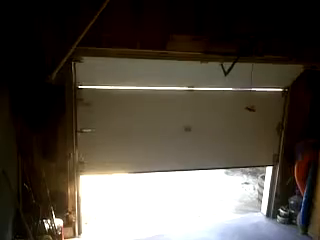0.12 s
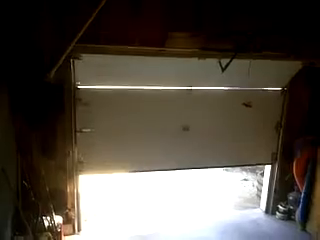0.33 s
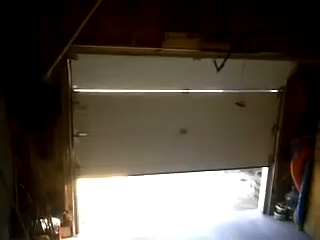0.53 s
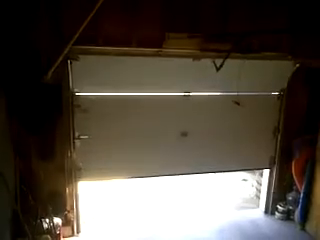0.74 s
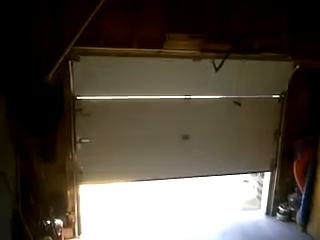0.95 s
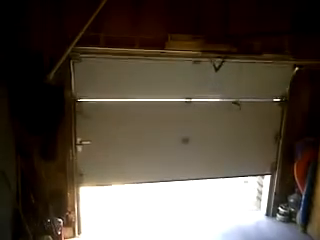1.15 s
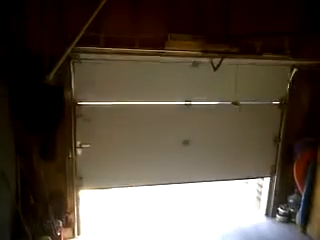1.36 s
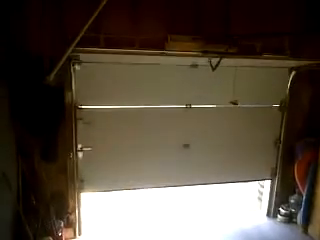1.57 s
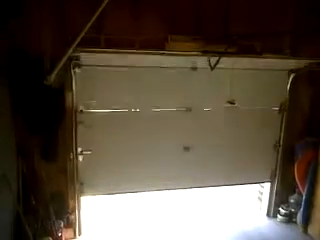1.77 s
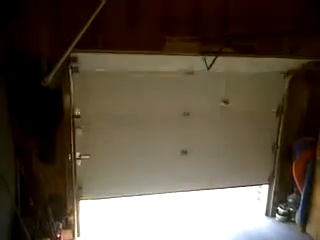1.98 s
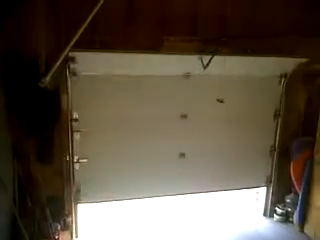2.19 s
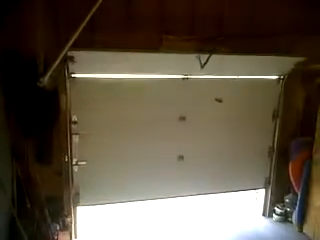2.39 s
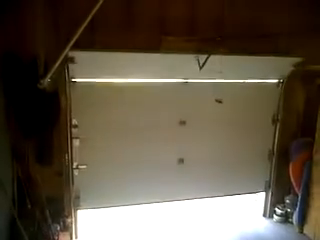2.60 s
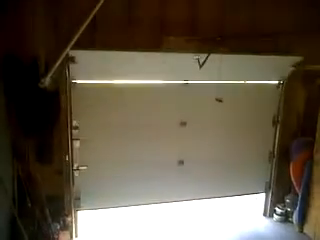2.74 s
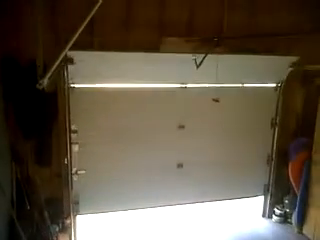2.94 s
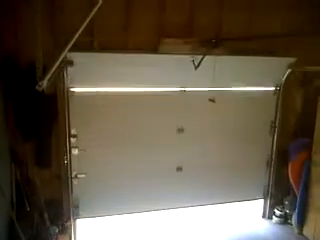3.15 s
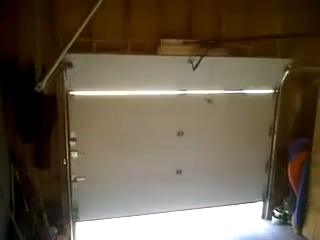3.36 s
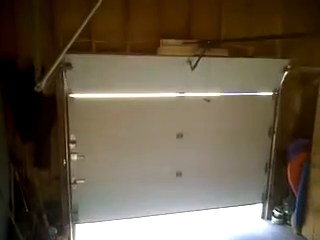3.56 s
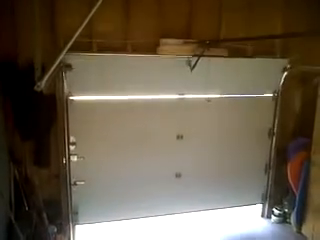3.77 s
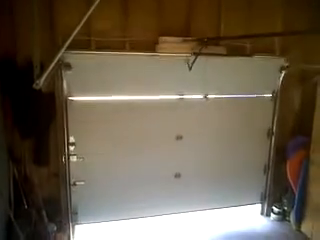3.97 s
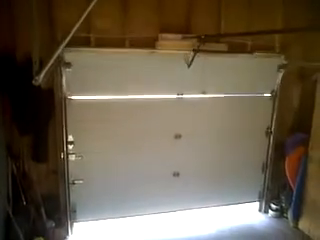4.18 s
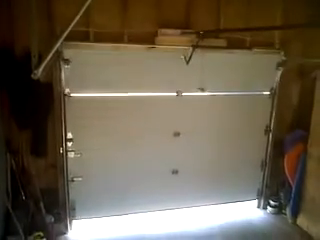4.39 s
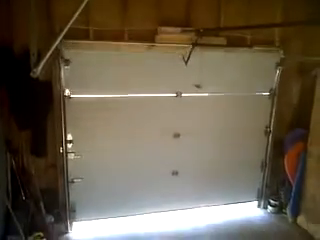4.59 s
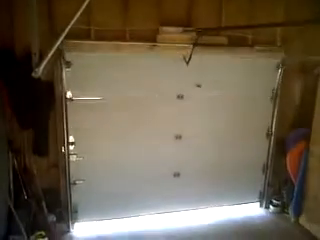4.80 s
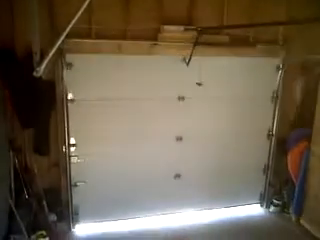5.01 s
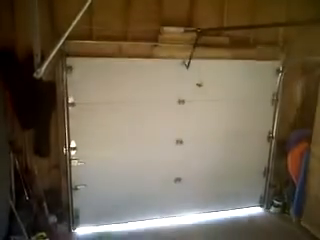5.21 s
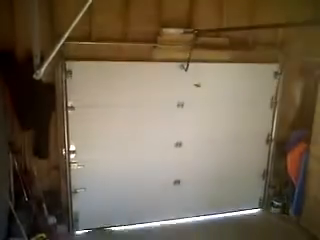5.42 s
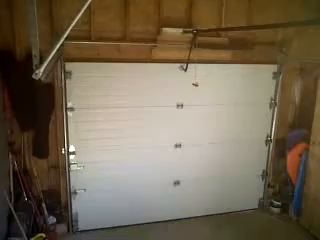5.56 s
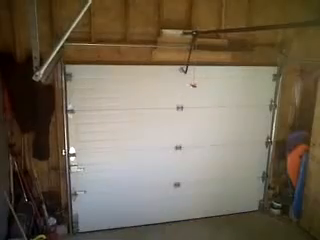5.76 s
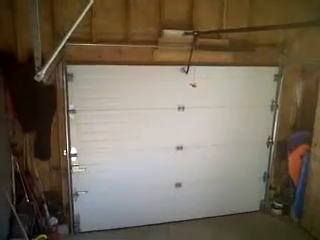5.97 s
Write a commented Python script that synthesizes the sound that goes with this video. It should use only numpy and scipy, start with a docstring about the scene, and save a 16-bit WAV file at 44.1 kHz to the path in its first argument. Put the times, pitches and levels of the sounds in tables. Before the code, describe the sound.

Inside a bare garage, an electric opener hums low and unsteadily while a sectional steel door descends. Rollers rumble, grind and hiss along the rails, with irregular clacks, hinge pings and soft panel thuds. A sharper metallic clank comes past the middle. At the end the hum swells briefly as the door meets the floor, the motor cuts out, and a few last clicks ring away. The microphone sounds dull in the treble.

```python
"""A motor hums while a sectional steel garage door rumbles, hisses, clatters and thuds down its track.
The hum is wavering sines on twice the mains rate; the rollers are flickering bands of noise.
Knocks are short bursts of noise that ring steel parts; panels, pings and a snapping wire are fading sines.
The hum jumps as the door meets the floor, the motor cuts out, and the bare garage rings out.
Faint outdoor air lies below; the treble of the whole sound is dulled."""
import sys
import numpy as np
from scipy import signal
from scipy.io import wavfile
from scipy.ndimage import uniform_filter1d

SR = 44100
rng = np.random.default_rng(int(sys.argv[2]) if len(sys.argv) > 2 else 0)


def dump_mix(stems):
    """Bounce the given channels to the path in sys.argv[1] as a 16-bit WAV at rate SR."""
    frames = np.atleast_2d(stems).T  # one column per channel
    limited = np.clip(frames, -1, 1)  # hard clip at full scale
    pcm = np.round(limited * 32767).astype(np.int16)
    wavfile.write(sys.argv[1], SR, pcm)


N = 266408
T = np.arange(N) / SR  # time in s
MOTOR_OFF_S = 5.665


def undb(db):
    """Turn decibels into a plain amplitude factor."""
    return 10 ** (np.asarray(db) / 20)


def unit(x):
    """Scale a signal to an RMS level of 1."""
    return x / np.sqrt(np.mean(x ** 2))


def band(x, lo_hz, hi_hz, order=2):
    """Keep only the sound between two frequencies; a higher order cuts more steeply."""
    return signal.sosfilt(signal.butter(order, [lo_hz, hi_hz], "band", fs=SR, output="sos"), x)


def ring(x, hz, t60):
    """One mode: every impulse starts a sine that fades by 60 dB in t60 seconds."""
    pole = np.exp(2j * np.pi * hz / SR - np.log(1000) / (t60 * SR))
    return signal.lfilter([1], [1, -pole], x).imag


def walk(rate):
    """Random levels held for 1 / rate s, then smoothed twice; RMS 1."""
    hold = int(SR / rate)
    steps = np.repeat(rng.standard_normal(N // hold + 1), hold)
    smooth = uniform_filter1d(uniform_filter1d(steps, hold), hold)
    return unit(smooth[:N])


def curves(table):
    """Draw straight lines between the rows of a table: one curve over time per column."""
    times, *columns = np.transpose(table)
    return [np.interp(T, times, column) for column in columns]


def bumps(rate, t60, spread_db):
    """Small random bumps in the rail: each shake starts at once and dies away; mean 1."""
    hit = rng.random(N) < rate / SR
    size = hit * undb(spread_db * rng.standard_normal(N))
    shake = signal.lfilter([1], [1, -1000. ** (-1 / (t60 * SR))], size)
    return shake / np.mean(shake)


def outdoors():
    """A faint low murmur of air and far traffic; the closing door shuts it out."""
    start_db, fade_db_per_s = -53.5, 0.9
    murmur = unit(band(rng.standard_normal(N), 27, 120))
    return undb(start_db - fade_db_per_s * T) * murmur


def garage(x):
    """Dense reflections off bare walls, made from fading noise; the treble dies a little sooner."""
    low_t60_s = 0.82
    t = T[:int(.8 * SR)]
    noise = rng.standard_normal(len(t))
    dull = band(noise, 46, 1300)
    rest = (noise - dull) * np.exp(-t / 0.21)
    build_up = np.minimum(t / 0.016, 1)
    tail = (dull + rest) * 1000. ** (-t / low_t60_s) * build_up
    return signal.fftconvolve(x, tail / np.sqrt(np.sum(tail ** 2)))[:N]


def snaps():
    """A spring wire snaps: a short bright twang whose pitch drops within a few cycles."""
    # Each snap: t/s, level/dB, start f/Hz
    wire_snaps = [(1.7224, -25.5, 6000), (1.7315, -33, 4300)]
    end_hz, glide_s, t60_s = 3600, 0.00098, 0.018
    out, t = np.zeros(N), T[:SR // 20]
    shape = np.minimum(t / 0.00063, 1) * 1000. ** (-t / t60_s)
    for s, db, hz in wire_snaps:
        pitch = end_hz + (hz - end_hz) * np.exp(-t / glide_s)
        i = int(s * SR)
        out[i:i + len(t)] += undb(db) * shape * np.sin(2 * np.pi * np.cumsum(pitch) / SR)
    return out


def pings():
    """A hinge or bracket struck once: one steel mode, soon damped."""
    # Each strike: t/s, level/dB, f/Hz
    strikes = [(0.077, -27, 1326), (.1, -29.5, 1338), (0.434, -41, 2560), (0.542, -36, 1421),
               (1.82, -35, 1690), (2.101, -34, 5840), (2.102, -39, 3420), (2.119, -33, 2300),
               (2.162, -36.5, 1550), (2.206, -35.5, 6040), (2.754, -36, 5124), (2.756, -39, 5770),
               (2.775, -40, 2368), (2.779, -34, 4478), (2.788, -38, 2430), (2.911, -40.5, 4490),
               (4.16, -40, 1716), (4.296, -29, 3100), (4.299, -28.5, 5810), (4.299, -26.5, 1150),
               (4.3, -29, 4651), (4.327, -28.5, 1128), (4.343, -34, 4700), (4.386, -34, 4600),
               (4.389, -39, 3229), (4.946, -36, 1210), (4.954, -39, 2480), (4.99, -40.5, 4780),
               (5.714, -38, 1765), (5.763, -35, 3531), (5.766, -39, 3160), (5.79, -37, 1430),
               (5.835, -38, 4250)]
    rise_s, t60_s = 0.001, 0.071
    out, t = np.zeros(N + SR), T[:SR // 10]
    shape = (1 - np.exp(-t / rise_s)) * 1000. ** (-t / t60_s)
    start_turns = rng.random((len(strikes), 1))  # random phase, in turns
    for (s, db, hz), turn in zip(strikes, start_turns):
        i = int(s * SR)
        out[i:i + len(t)] += undb(db) * shape * np.sin(2 * np.pi * (hz * t + turn))
    return out[:N]


def thuds():
    """A soft push sets a broad panel mode ringing as a close pair, with a short boom of the whole sheet."""
    # Pushes on the panels: t/s, level/dB relative to the other pushes, f/Hz
    pushes = [(0.087, -29, 158), (0.201, -28, 140.5), (0.16, -25.5, 168), (0.231, -31, 300),
              (0.359, -26.5, 170), (0.461, -29.5, 160), (0.505, -23, 356), (0.779, -28.5, 141),
              (0.819, -27, 204), (0.857, -29, 159), (0.97, -23.5, 356), (1.137, -26, 246),
              (1.453, -31, 228), (1.585, -32.5, 176), (1.747, -26.5, 234), (1.77, -32, 162),
              (1.795, -34, 165), (1.852, -25.5, 302), (2.092, -28.5, 144), (2.16, -29.5, 150),
              (2.314, -33.5, 159), (2.7, -23, 556), (2.794, -36, 141), (2.869, -27, 143), (2.916, -32, 333),
              (3.272, -28.5, 153), (3.782, -32, 136), (3.844, -33, 149), (4.159, -25.5, 235),
              (4.215, -22, 232), (4.241, -30, 230), (4.349, -39.5, 129), (5.501, -32, 146)]
    fade_cycles = 22.3  # cycles a panel mode rings until it is 60 dB down
    out, boom = np.zeros((2, N + SR))
    t = T[:SR // 2]
    for s, db, hz in pushes:
        shape = undb(db) * (1 - np.exp(-t / 0.0083)) * 1000. ** (-t * hz / fade_cycles)
        pair = np.sin(2 * np.pi * hz * t) + 0.35 * np.sin(2 * np.pi * 1.13 * hz * t)
        i = int(s * SR)
        out[i:i + len(t)] += shape * pair
        boom[i:i + len(t)] += shape
    sheet = unit(band(rng.standard_normal(N), 120, 620))
    return undb(-1.0) * out[:N] + undb(-11.0) * boom[:N] * sheet


def loose_rollers():
    """Loose rollers rattle against the track at random while the motor runs: each hit is fading noise."""
    hits_per_s, level_db, spread_db, t60_s = 30, -46, 2.5, 0.065  # level relative to the knocks
    hit = (rng.random(N) < hits_per_s / SR) * (T < MOTOR_OFF_S)
    size = hit * undb(level_db + spread_db * rng.standard_normal(N))
    shiver = signal.lfilter([1], [1, -1000. ** (-1 / (t60_s * SR))], size)
    return band(shiver * rng.standard_normal(N), 600, 5300)


def clatter():
    """Each knock is a volley of uneven ticks that holds for a moment, then dies; the steel hardware rings."""
    # Hinge and trolley knocks: t/s, relative level/dB, centre f/Hz, spread/octaves, hold/s, fade t60/s
    knocks = [(0.069, -47, 2505, .7, 0.025, .1), (0.071, -40.5, 1196, 0.6, 0.028, 0.083),
              (0.162, -47, 1380, 0.39, 0.0061, .06), (0.18, -44, 3200, 0.36, 0.018, 0.1),
              (0.365, -44.5, 1464, 0.35, 0.0078, 0.054), (0.154, -50, 4330, 1.1, 0.061, 0.055),
              (0.279, -48.5, 5160, 0.47, 0.011, 0.26), (0.432, -43, 2320, 0.65, 0.0058, 0.045),
              (0.478, -43, 1805, 0.94, 0.023, 0.21), (0.48, -46.5, 790, .7, .02, .08),
              (0.504, -39.5, 784, 0.72, 0.0088, 0.088), (0.537, -41.5, 1444, 0.29, 0.0069, 0.21),
              (0.655, -46.5, 1286, 0.39, 0.018, 0.25), (0.8, -54, 2520, 1.3, 0.012, 0.52),
              (0.917, -52.5, 2400, .8, 0.0087, .08), (0.983, -50.5, 2640, .8, 0.017, 0.14),
              (1.119, -51.5, 1800, 1.5, 0.024, 0.66), (1.535, -49, 1616, 0.71, 0.022, 0.066),
              (1.651, -50.5, 4580, 0.27, .004, 0.045), (1.724, -47, 4200, 0.77, 0.0034, 0.055),
              (1.741, -46, 1467, 0.88, 0.018, 0.062), (1.775, -43, 940, .6, 0.01, 0.054),
              (1.846, -50, 1397, 0.44, 0.013, 0.053), (1.801, -49, 1910, 0.62, 0.016, 0.13),
              (2.092, -40, 2500, 1.04, 0.02, 0.38), (2.207, -45.5, 2155, 1.1, 0.0085, 0.16),
              (2.208, -43.5, 6030, 0.2, 0.011, 0.39), (2.51, -54.5, 3260, 1.3, 0.015, 0.13),
              (2.718, -46, 3400, 0.3, .02, 0.049), (2.756, -44, 2100, 0.87, 0.025, 0.45),
              (2.799, -56, 1660, 0.26, 0.011, 0.078), (2.752, -41, 4700, 0.35, 0.014, 0.49),
              (2.859, -50, 1470, 0.85, 0.014, 0.041), (2.883, -47, 4740, .3, 0.016, 0.06),
              (2.904, -49, 2130, 3.4, 0.02, 0.065), (3.272, -58.5, 2510, 2.1, 0.048, 0.29),
              (3.976, -62.5, 2180, 1.9, 0.037, 0.18), (4.148, -51, 2260, 0.77, 0.12, 0.22),
              (4.147, -43.5, 4650, 0.17, 0.092, 0.2), (4.161, -44.5, 1860, 0.12, 0.028, 0.16),
              (4.194, -45, 3020, 0.44, 0.035, 0.081), (4.2943, -34.5, 2590, 1.22, 0.027, 0.33),
              (4.297, -44.5, 5380, 0.23, 0.0078, 0.17), (4.327, -40, 1120, 0.43, 0.016, 0.047),
              (4.932, -47, 3040, 2, 0.0092, 0.5), (4.933, -43, 4940, .35, 0.013, 0.086),
              (4.974, -45.5, 4750, 0.21, .025, 0.23), (4.937, -48.5, 1227, 0.24, 0.0082, 0.091),
              (5.262, -58, 3490, 1.2, 0.0089, 0.11), (5.706, -47, 4280, .9, 0.084, 0.24),
              (5.719, -45, 1510, 0.43, 0.0073, 0.11), (5.766, -44.5, 3290, 0.4, 0.0074, 0.056),
              (5.775, -46, 1256, 0.71, 0.02, 0.17), (5.835, -46.5, 4100, .25, 0.0061, 0.05),
              (5.836, -48.5, 1405, .4, 0.0092, 0.072)]
    # Edges of the frequency bands that build up a knock: f/Hz
    edges_hz = [450, 800, 1000, 1300, 1500, 1900, 2600, 3500, 4400, 5300, 6000, 7300]
    # Colour that the track gives every knock, one value per band: level/dB
    track_db = (4, -5, -2.5, -8, -2.5, -1.5, 0.5, -1.5, 0, 0.2, 3.5)
    # Ringing modes of the steel hardware: f/Hz, relative level/dB, fade t60/s
    hardware = [(1061, 2, 0.14), (1211, 2, 0.14), (1368, 0, 0.1), (1630, 0, 0.14), (1790, -2, .12),
                (2080, -1, 0.14), (2287, -1, .15), (2351, -1, .15), (2415, 0, 0.15), (2560, -2, .14),
                (3003, -3, 0.15), (3126, 0, .15), (3465, -2, 0.16), (4673, -5, 0.12)]

    t = T[:SR // 2]
    ticks = rng.standard_normal((len(knocks), 2, len(t)))
    centres = np.sqrt(np.multiply(edges_hz[1:], edges_hz[:-1]))
    tracks = np.zeros((len(edges_hz) - 1, N + len(t)))
    for (s, level_db, hz, spread, hold, t60), (noise, size) in zip(knocks, ticks):
        # 6 dB weaker at one spread away from the centre; the spread is at least 0.2 octaves
        distance = np.log2(centres / hz) / max(spread, .2)
        db = level_db + np.array(track_db) - 6 * distance ** 2
        rise = np.minimum(t / .0015, 1)
        fade = 1000. ** (-np.maximum(t - hold, 0) / max(t60, .01))
        uneven = undb(1.6 * size[::120].repeat(120)[:len(t)])  # a new size every 120 samples
        volley = unit(noise * uneven) * rise * fade
        i = int(s * SR)
        tracks[:, i:i + len(t)] += undb(db)[:, None] * volley

    blow = np.zeros(N)
    for x, lo, hi in zip(tracks, edges_hz, edges_hz[1:]):
        makeup = np.sqrt(SR / 2 / (hi - lo))  # a narrow band keeps less of the noise
        blow += band(x, lo, hi, order=4)[:N] * makeup
    blow = blow + loose_rollers()
    modes = sum(undb(db) * ring(blow, hz, t60) for hz, db, t60 in hardware)
    ringing = undb(-9) * np.std(blow) * unit(modes)  # 9 dB below the blows
    return undb(-2.0) * (blow + ringing)


def rolling():
    """Rollers grind along the rails: noise bands flicker alone, bumps shake all or some, the rail sings faintly."""
    # How the door travels: t/s, panel rumble level/dB, roller grind level/dB, rail hiss level/dB
    travel = [(0, -42, -45, -51), (.28, -41, -48.5, -44.5), (.75, -44.5, -52, -58.5), (1.15, -45, -50, -54),
              (1.6, -42, -53.5, -54.5), (1.85, -43.5, -46.5, -51), (1.95, -48, -55, -49),
              (2.3, -43, -50, -48.5), (2.5, -46.5, -54.5, -53), (2.95, -45, -51.5, -47.5),
              (3.3, -47.5, -52, -51), (4.1, -46, -53.5, -51.5), (4.5, -48.5, -53, -49),
              (5.1, -47, -52, -52.5), (5.45, -50.5, -57, -54.5), (5.88, -51.5, -55.5, -51.5)]
    # Noise colour within rumble, grind and hiss: f/Hz, relative level per Hz/dB
    colour = [(100, -26), (150, 0.5), (200, -10), (350, -7.5), (550, -13), (720, -11.5), (900, -17.5),
              (1230, -11), (2200, -20), (3500, -18), (5300, -16), (7000, -20)]
    # Ringing modes of the rail: f/Hz, level over the grind/dB, fade t60/s
    rail_modes = [(535, -12.5, 0.024), (769, -8, 0.039), (1186, -12.5, 0.13), (1380, -18.5, 0.13),
                  (1718, -12.5, 0.3), (2405, -14, 0.038)]

    # The rollers stop: rumble, grind and hiss step down, then fade
    door_rests_s, stop_s, settle_db_per_s = 5.9, .005, 57
    stop_db = np.array((-6.5, -5, -13.5))[:, None]
    still = np.maximum(T - door_rests_s, 0)
    settle_db = stop_db * np.minimum(still / stop_s, 1) - settle_db_per_s * still
    rumble_db, grind_db, hiss_db = curves(travel) + settle_db

    hz_points, db_points = np.transpose(colour)
    parts = np.zeros((3, N))  # rumble, grind, hiss
    shared_shake = np.sqrt(.75 + .25 * bumps(45, .08, 3))
    for hz in 100 * 2 ** np.arange(0, 6.3, 1 / 3):  # third-octave bands
        # The band's width grows with its frequency, so its power does too
        db = np.interp(np.log(hz), np.log(hz_points), db_points) + 10 * np.log10(hz)
        noise = unit(band(rng.standard_normal(N), hz / 2 ** (1 / 6), hz * 2 ** (1 / 6)))
        flicker = undb(db + 1.5 * walk(40))
        own_shake = np.sqrt(.5 + .5 * bumps(40, .06, 3))
        part = int(hz > 800) + int(hz > 3000)
        parts[part] += noise * flicker * shared_shake * own_shake

    rail = np.zeros(N)
    for hz, db, t60 in rail_modes:
        rail += undb(db + 2.4 * walk(25)) * unit(ring(rng.standard_normal(N), hz, t60))
    rumble = unit(parts[0]) * undb(rumble_db)
    grind = (unit(parts[1]) + rail) * undb(grind_db)
    hiss = unit(parts[2]) * undb(hiss_db)
    return rumble + grind + hiss


def motor():
    """Magnetic pull at twice the mains rate; the overtones reach the air through shaking parts and waver more."""
    # Levels: t/s, hum level/dB, 2nd partial level/dB, 3rd partial level/dB, housing buzz (6th) level/dB
    partial_levels = [(0.0, -42, -58.5, -42.5, -74), (0.11, -44.5, -66, -55, -57),
                      (0.23, -36.5, -47, -44, -65), (0.28, -41.5, -49, -47, -50.5),
                      (0.45, -50, -53, -56, -60), (0.49, -42.5, -55.5, -46, -52),
                      (0.68, -47.5, -48, -59, -65), (0.73, -46.5, -68, -57, -47),
                      (0.78, -39.5, -52, -43.5, -60), (0.94, -49.5, -46.5, -53.5, -52.5),
                      (1.04, -50, -58, -63, -50), (1.15, -44.5, -51, -44, -50),
                      (1.23, -46, -51, -55.5, -51), (1.39, -48.5, -55, -49.5, -45.5),
                      (1.5, -39.5, -49.5, -48.5, -55), (1.71, -45, -50, -50.5, -51),
                      (1.78, -41.5, -43.5, -65, -48), (1.84, -44, -44, -43.5, -62),
                      (1.94, -47, -62, -54.5, -53), (2.13, -47, -50, -58, -57.5),
                      (2.17, -43.5, -51, -76, -45.5), (2.39, -51, -58, -44, -67),
                      (2.45, -50, -63, -52, -51), (2.62, -47, -68, -59, -56.5),
                      (2.84, -41, -65, -59, -48.5), (2.89, -39, -57, -64, -42),
                      (2.92, -36, -43.5, -45, -56), (2.96, -42.5, -61, -49.5, -49),
                      (3.13, -40.5, -62, -56, -57), (3.49, -39.5, -59, -54.5, -51),
                      (3.65, -48.5, -51, -47, -60), (3.68, -48, -63, -73, -52),
                      (3.75, -46, -51.5, -56, -65), (3.8, -39.5, -64, -63, -51.5),
                      (3.89, -42, -58.5, -78, -54.5), (4.11, -41.5, -74, -45, -52.5),
                      (4.16, -43.5, -50, -55, -56), (4.22, -33, -55, -43, -57),
                      (4.44, -52, -63, -56, -49.5), (4.48, -44, -54.5, -55, -59),
                      (4.75, -45, -62.5, -52, -50.5), (4.9, -41, -57.5, -68.5, -59),
                      (5.27, -46, -66, -50, -54), (5.35, -45.5, -53.5, -61, -56),
                      (5.46, -44.5, -70, -80, -49.5), (5.57, -45, -59, -54, -63)]
    hum_hz = 119.87
    # For each partial: base depth of the wavering and its changes per s
    wavers, waver_rates = (.27, .8, .85, 1.2), (35, 40, 56, 90)
    strain_s, strain_db, strain_fade_s = 5.583, 13, 0.034
    run_down_db_per_s = 508

    phase = 2 * np.pi * hum_hz * T
    hum_db, *overtones = curves(partial_levels)
    # The hum jumps as the door meets the floor
    after = T - strain_s
    hum_db = hum_db + strain_db * np.clip(after / 0.011, 0, 1) * np.exp(-(after / strain_fade_s) ** 2)
    overtones = [db + 1 * walk(11) for db in overtones]  # random swell: 1 dB, 11 changes per s
    steadying = 1.3 - .1 * T  # the partials steady as more of the door hangs upright
    out = 0
    for k, db, waver, rate in zip((1, 2, 3, 6), [hum_db] + overtones, wavers, waver_rates):
        # A complex shake wavers both loudness and phase
        shake = 1 + waver * steadying * (walk(rate) + 1j * walk(rate))
        out = out + undb(db) * unit((shake * np.exp(1j * k * phase)).imag)
    return out * undb(-run_down_db_per_s * np.maximum(T - MOTOR_OFF_S, 0))


def scene():
    """Add all sources; only the hits excite the garage's reflections, 12 dB down."""
    hits = clatter() + thuds() + snaps() + pings()
    echoes = undb(-12) * garage(hits)
    return (motor() + rolling() + outdoors() + hits + echoes)[None]


def record(dry):
    """A narrow dip near 4 kHz, an early treble roll-off, a slight constant offset, and a cut top."""
    dip_hz, soft_hz, edge_hz, top_hz = 3995, 5910, 7200, 7957
    offset = .0008
    x = dry - .75 * signal.lfilter(*signal.iirpeak(dip_hz, 25, fs=SR), dry)
    x = signal.sosfilt(signal.butter(4, soft_hz, fs=SR, output="sos"), x)
    x = signal.sosfilt(signal.ellip(10, .5, 50, edge_hz, fs=SR, output="sos"), x + offset)
    return signal.sosfilt(signal.ellip(8, .2, 70, top_hz, fs=SR, output="sos"), x)


dry = scene()
out = record(dry)
dump_mix(out)
```